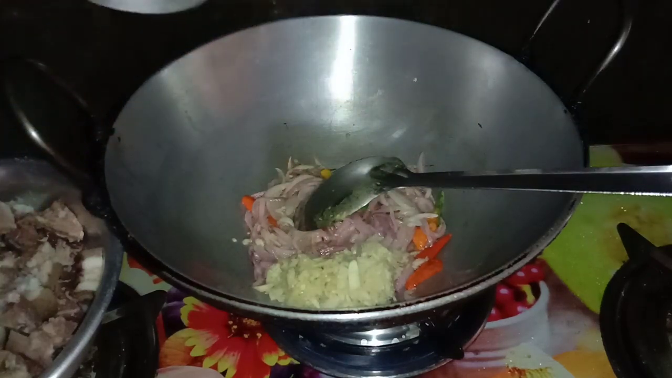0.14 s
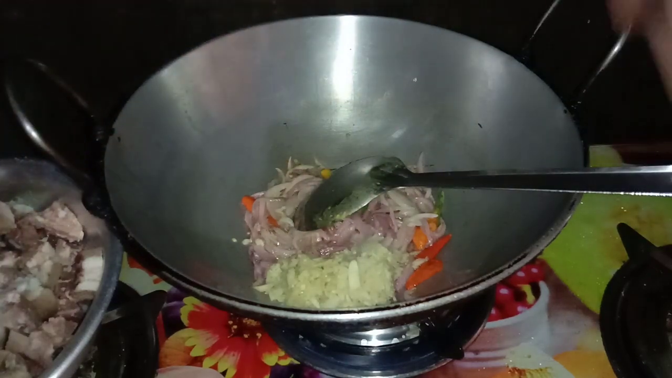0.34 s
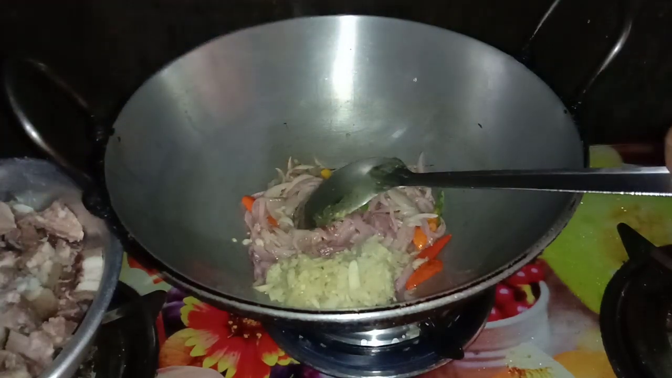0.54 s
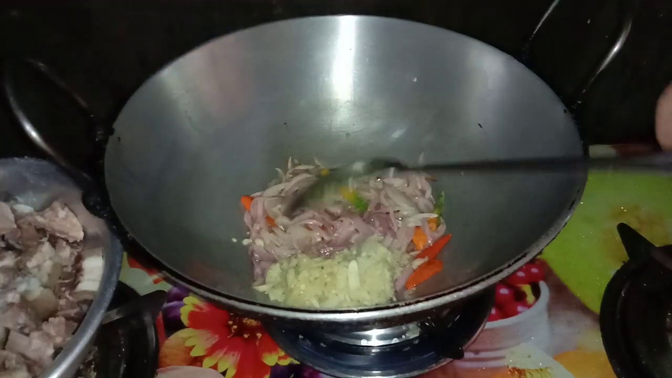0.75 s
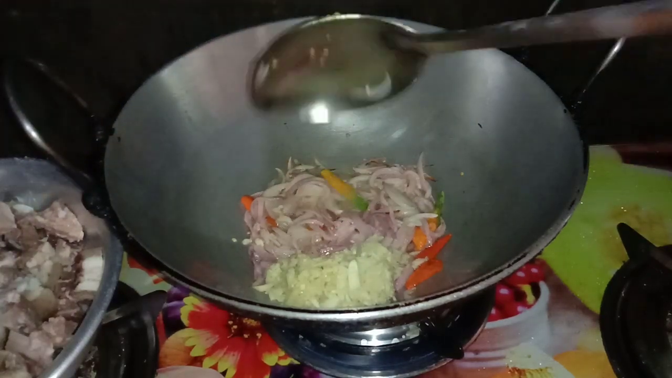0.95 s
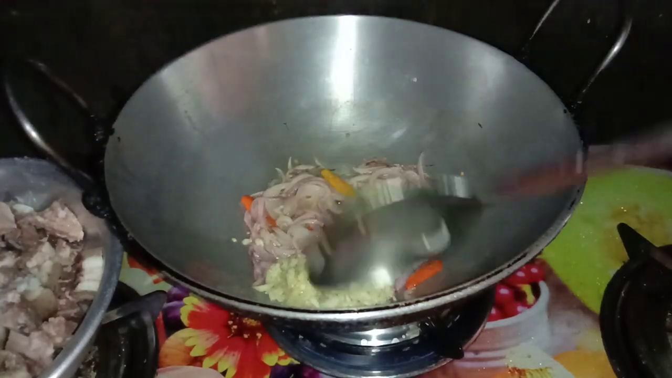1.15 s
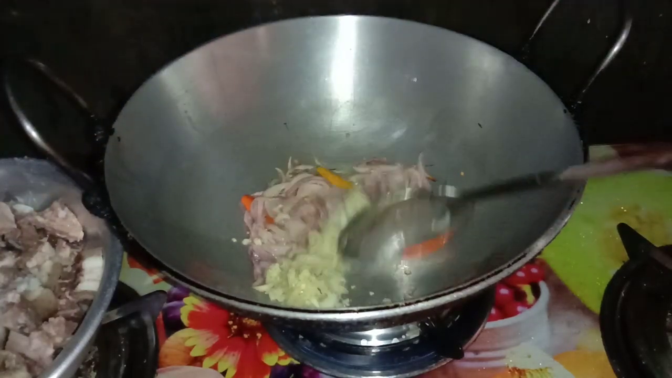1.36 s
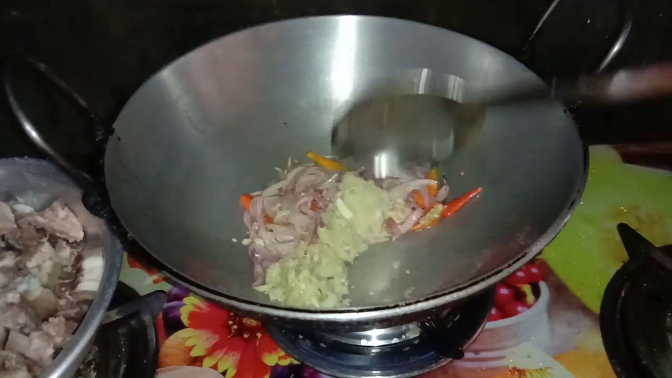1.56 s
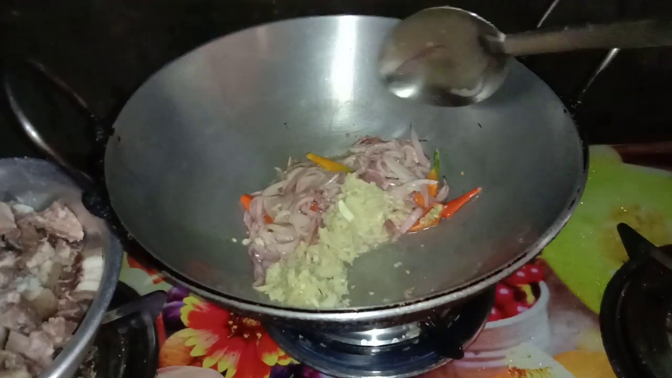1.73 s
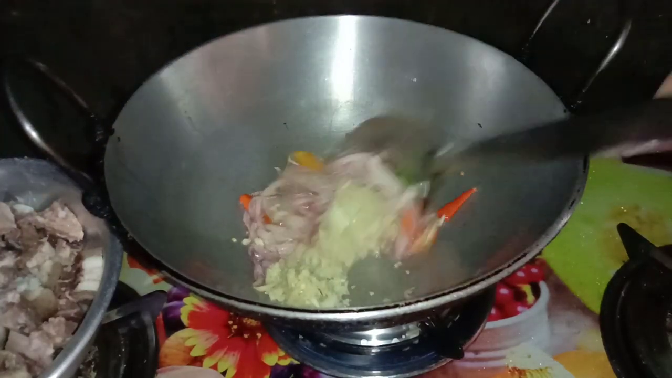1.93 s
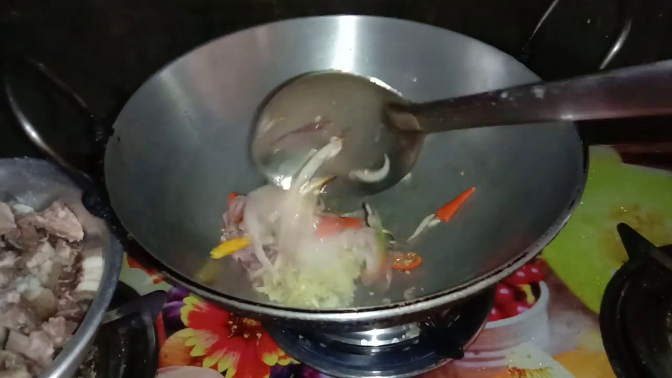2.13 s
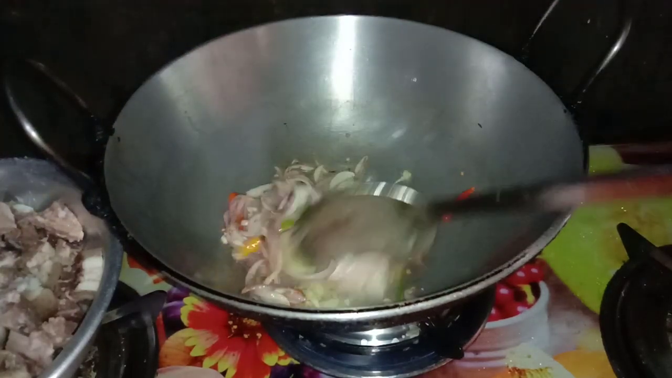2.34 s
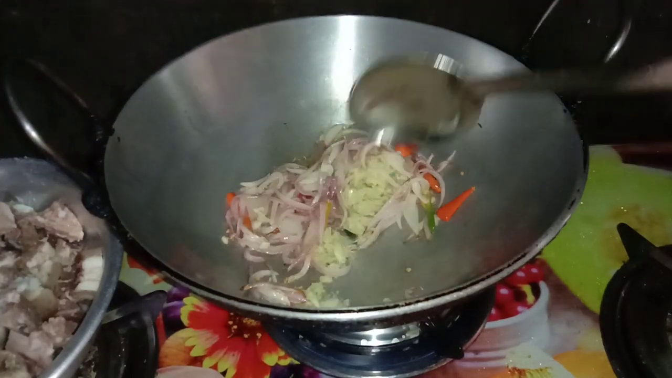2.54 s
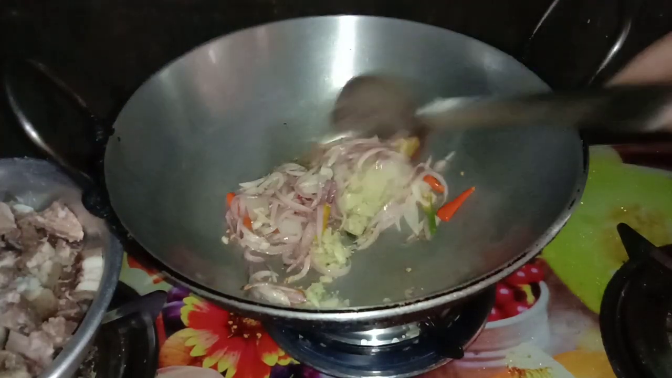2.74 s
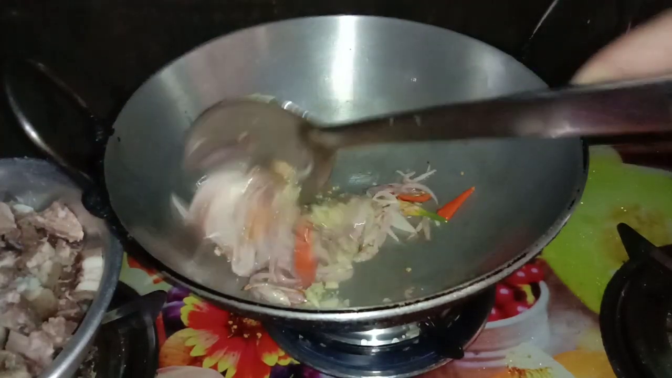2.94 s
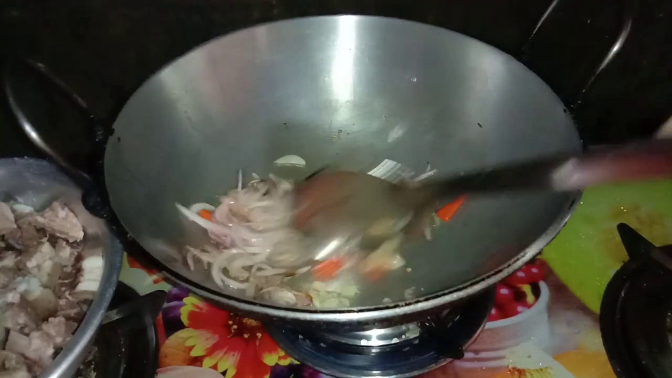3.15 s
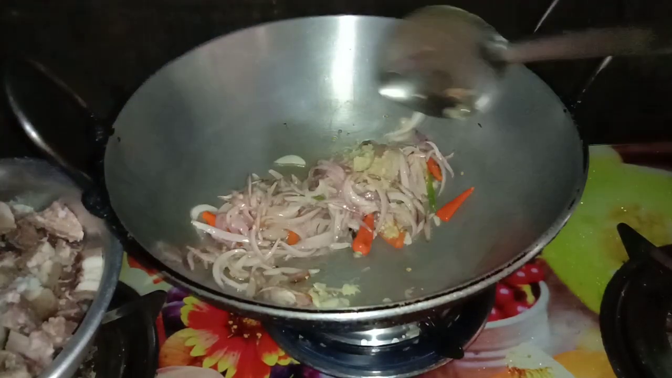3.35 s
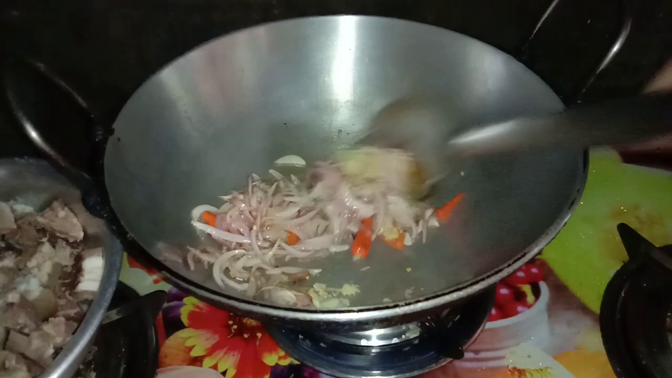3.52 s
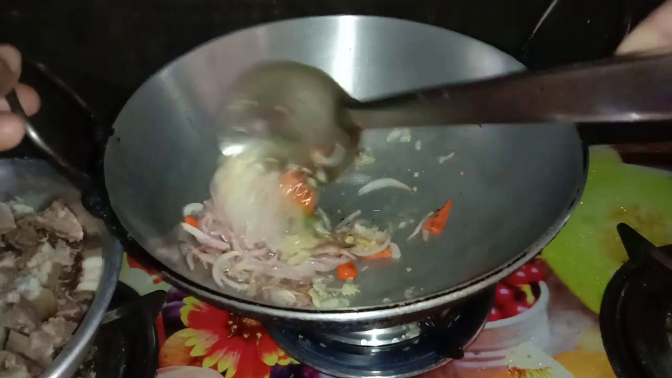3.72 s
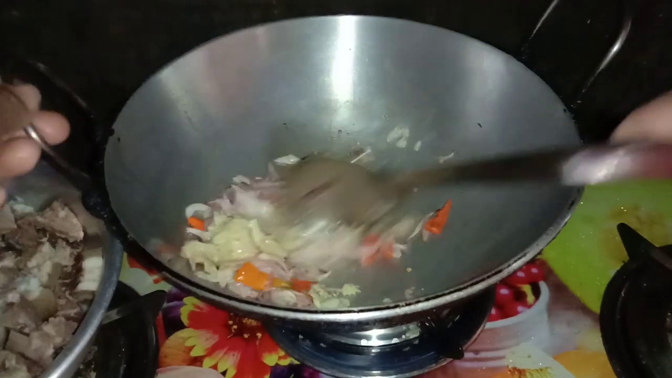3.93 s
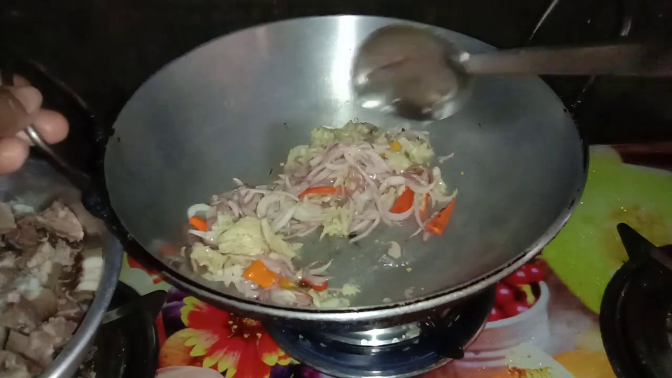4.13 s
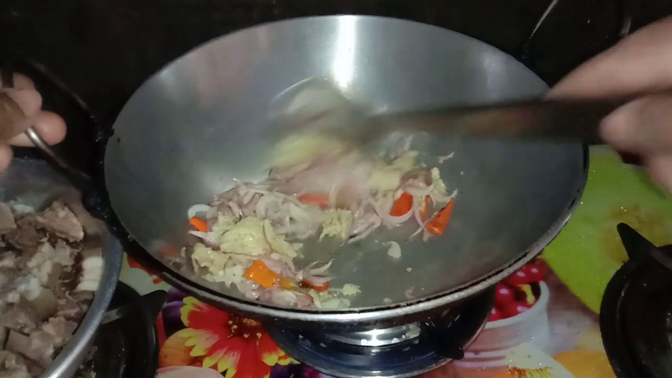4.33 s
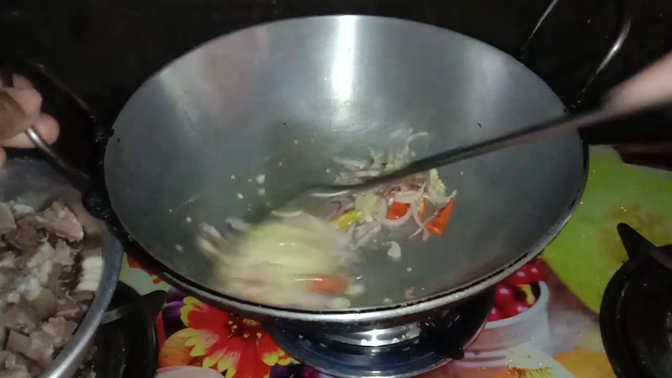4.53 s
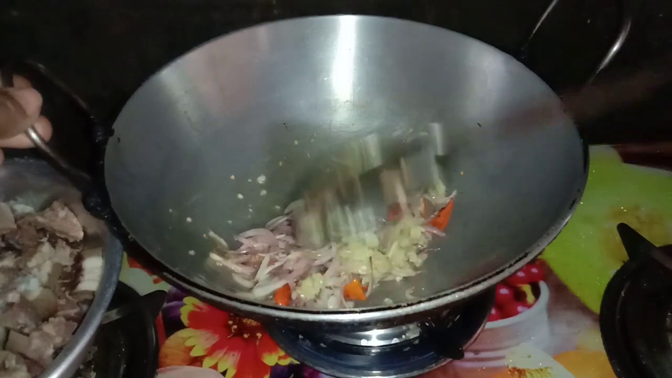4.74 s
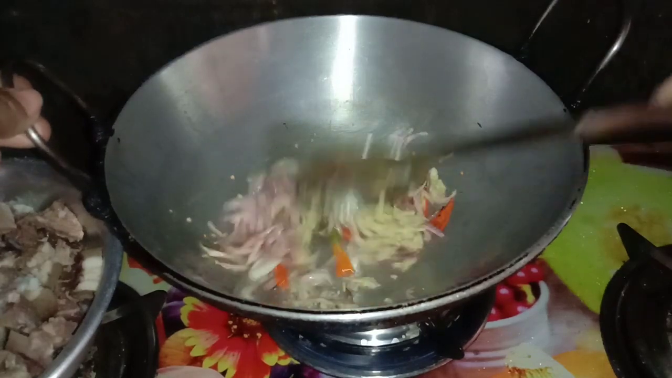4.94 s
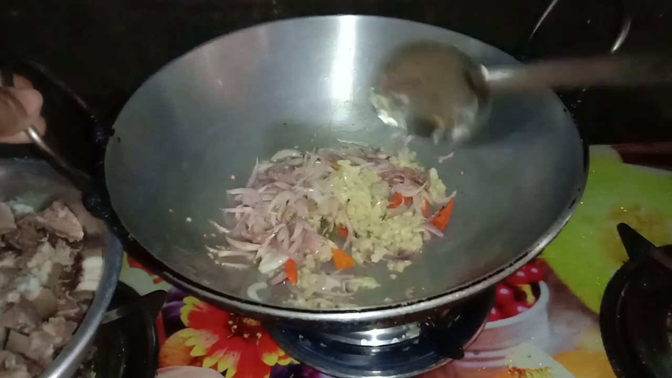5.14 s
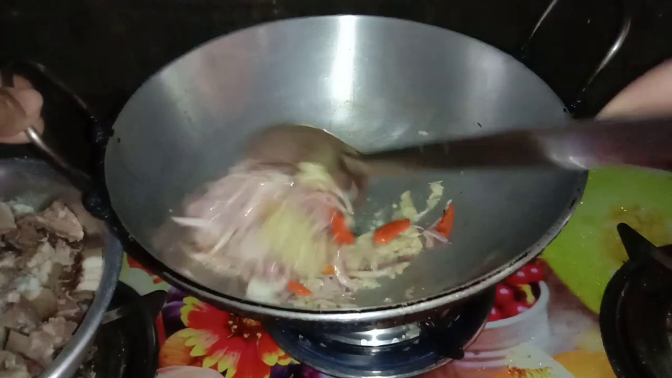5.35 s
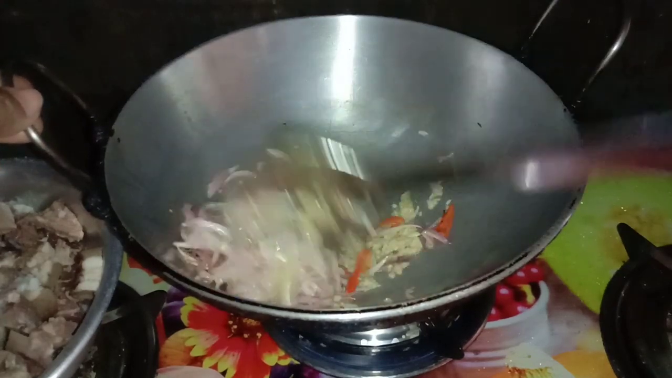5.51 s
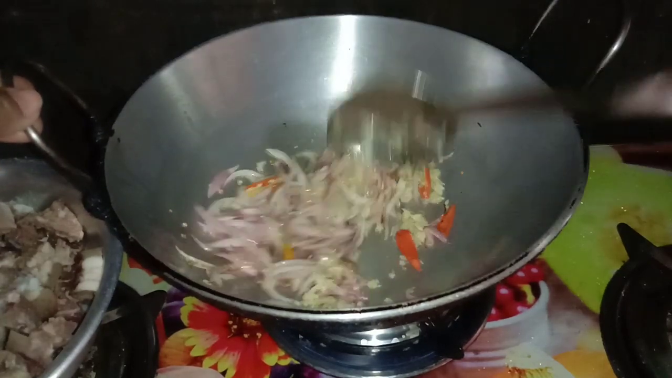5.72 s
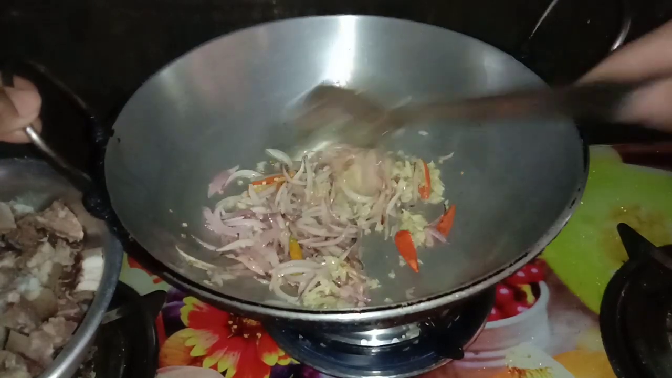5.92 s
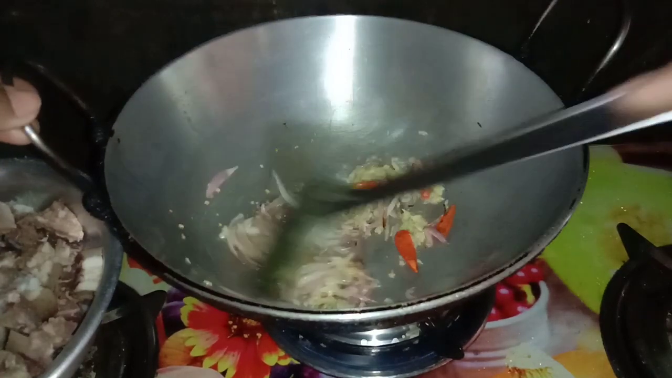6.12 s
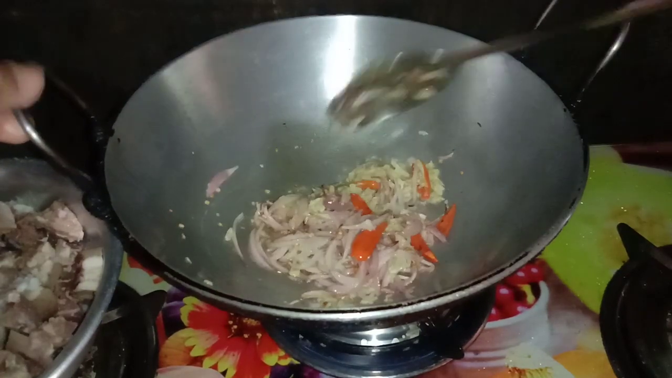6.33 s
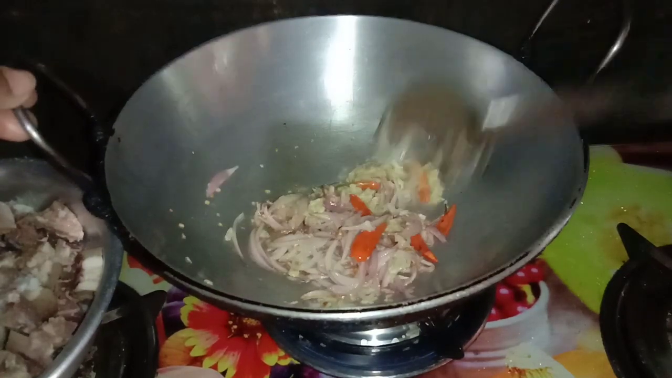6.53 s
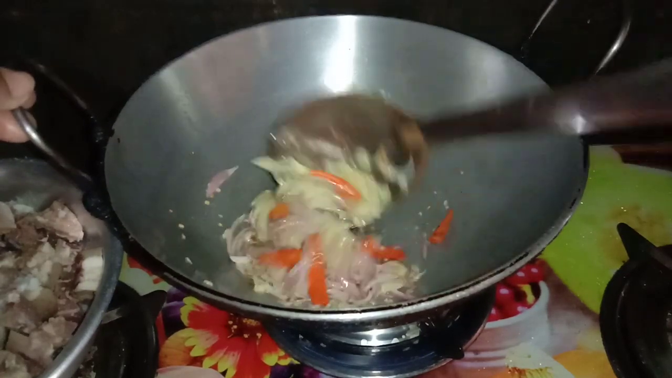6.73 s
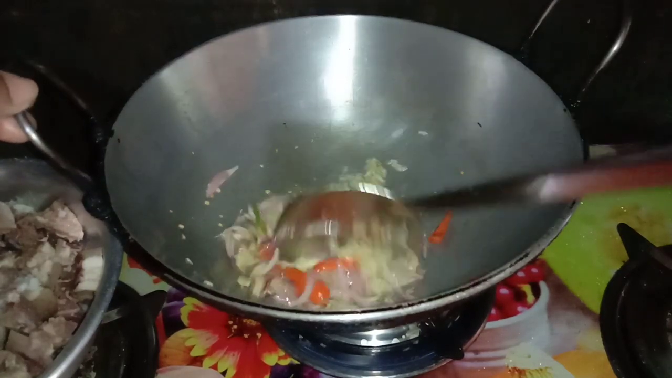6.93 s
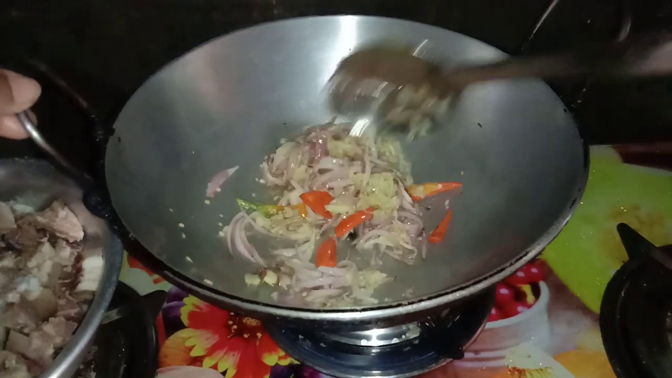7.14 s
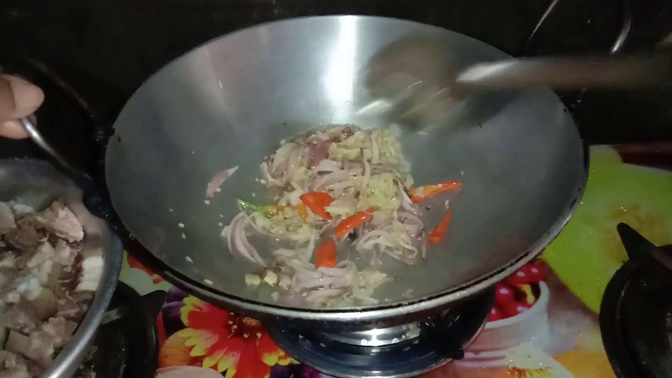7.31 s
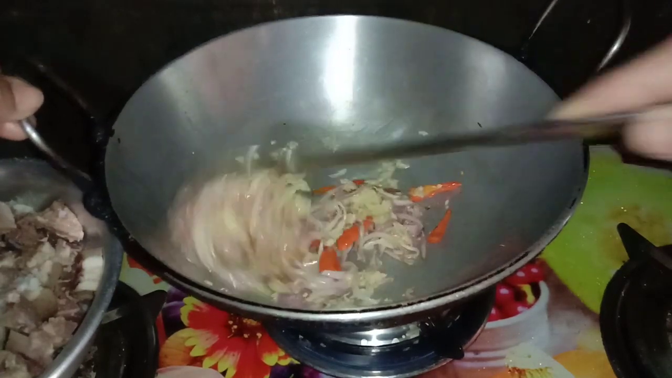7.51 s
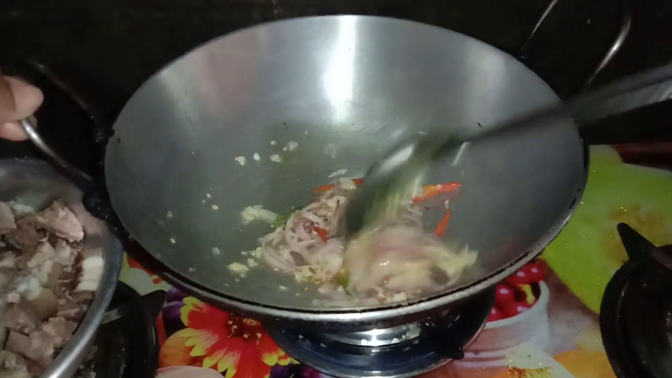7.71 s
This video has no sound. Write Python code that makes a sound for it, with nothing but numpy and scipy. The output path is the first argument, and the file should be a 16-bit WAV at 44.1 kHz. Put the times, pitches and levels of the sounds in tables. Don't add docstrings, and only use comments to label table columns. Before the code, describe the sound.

Wet vegetables sizzle and crackle steadily in a wok of hot oil, with steel ticks, spoon taps and short metallic scrapes.

```python
import sys
import numpy as np
from scipy import signal
from scipy.fft import rfft, irfft
from scipy.io import wavfile
from scipy.ndimage import uniform_filter1d, map_coordinates

SR = 44100
rng = np.random.default_rng(int(sys.argv[2]) if len(sys.argv) > 2 else 0)


def to_wav(sig):
    pcm = np.clip(np.atleast_2d(sig), -1, 1) * 32767
    pcm = np.round(pcm).astype(np.int16)
    wavfile.write(sys.argv[1], SR, pcm.T)


def rack_gain(trim_db):
    fader = np.asarray(trim_db, float)
    return 10 ** (fader / 20)


N = 342657
TIME_S = np.arange(N) / SR

# t/s, frying level/dB
HEAT = [(0, -37.5), (.7, -39.5), (1.15, -38.5), (1.3, -35), (1.5, -33.5), (1.8, -36.5), (2.05, -32),
        (2.45, -29), (2.7, -32.5), (2.92, -30), (3.5, -31), (3.85, -32), (4.05, -34), (4.25, -32),
        (5.05, -28.5), (5.3, -30), (6.0, -30.5), (6.75, -30), (6.95, -29), (7.35, -31), (7.5, -30),
        (7.77, -31)]
# t/s, depth/dB, length/s
FOLDS = [(0.484, 2.5, 0.05), (1.19, 3, 0.039), (1.396, 3.5, 0.075), (1.622, 0, 0.092), (2.365, 5, 0.07),
         (2.512, 6, 0.025), (2.631, 3.5, 0.046), (3.094, 2, 0.16), (3.593, 3.5, 0.097), (3.77, 6, 0.035),
         (3.92, 2, 0.11), (3.978, 4.5, 0.022), (4.227, 2, 0.038), (4.319, 5, 0.045), (4.381, 3.5, 0.027),
         (4.476, 3.5, 0.019), (4.575, 4, 0.085), (4.797, 4, 0.12), (4.972, 2.5, 0.091), (5.126, 6.5, 0.097),
         (5.262, 2.5, 0.039), (5.464, 1.5, 0.068), (5.608, 3, 0.03), (5.815, 3.5, 0.056), (5.876, 3, 0.017),
         (6.089, 6, .02), (6.108, 6.5, 0.035), (6.296, 3.5, 0.078), (6.68, 3.5, 0.08), (6.838, 4.5, 0.085),
         (7.012, 4.5, 0.058), (7.173, 3.5, 0.11), (7.592, 3, 0.074)]
# f/Hz, density/dB per Hz
FRY_COLOUR = [(500, -36.5), (850, -23), (1250, -17), (1600, -12.5), (2400, -11.5), (3800, -7), (5000, -4),
              (6000, -1), (6600, -1), (7400, -0.5), (9000, -12), (12400, -21), (13900, -26), (14650, -10.5)]
# f/Hz, width/Hz, level/dB
BOWL_MODES = [(1278, 109, -19.5), (2163, 420, -29.5), (3346, 860, -26)]
# t/s, peak/dB, t60/s, f/Hz
SPURTS = [(1.098, -11, 0.026, 3580), (1.412, -29, 0.016, 7200), (1.509, -22, 0.053, 7400),
          (2.2679, -13.5, 0.24, 5500), (2.5357, -24, 0.059, 5800), (3.014, -24, 0.042, 6200),
          (4.0249, -16.5, 0.2, 7500), (4.404, -18.5, 0.12, 6270), (4.548, -11, 0.021, 4800),
          (4.619, -20, 0.059, 6500), (5.473, -15.5, 0.061, 6600), (5.845, -14, 0.08, 5800),
          (5.89, -19.5, .1, 4900), (5.908, -17, .04, 7300), (6.8664, -24, 0.041, 5900),
          (6.457, -8, .02, 9500), (7.256, -9.5, .03, 7200)]
# middle t/s, change/dB, length/s, f/Hz
PATCHES = [(0.329, 2, 0.058, 5509), (0.524, 3, 0.14, 5509), (0.559, 1, 0.108, 14465),
           (0.743, -1.7, 0.164, 8584), (0.973, 1.5, 0.061, 5509), (1.028, 3.9, 0.057, 14465),
           (1.287, 2.1, 0.168, 14465), (1.332, -3.5, 0.124, 5509), (1.352, 0.5, 0.185, 2049),
           (1.467, 2.5, 0.104, 8584), (1.53, 6, 0.061, 14465), (1.566, -2.4, 0.091, 3588),
           (1.626, 5, 0.046, 14465), (1.641, 3, 0.152, 2049), (1.736, -6.5, 0.081, 2049),
           (1.806, -2.7, 0.09, 3588), (1.936, 3, 0.098, 14465), (1.955, 2, 0.084, 5509),
           (1.98, 1.5, 0.076, 8584), (2.065, -2.0, 0.069, 5509), (2.213, -4.5, 0.15, 8584),
           (2.449, 4, 0.12, 2049), (2.715, 4.5, 0.074, 2049), (2.993, 1.8, 0.115, 5509),
           (3.991, 4.0, 0.071, 8584), (4.031, 4.2, 0.071, 14465), (4.151, 3, 0.114, 14465),
           (4.405, -1.5, 0.182, 3588), (4.545, -2, 0.108, 14465), (4.644, 1.5, 0.164, 2049),
           (4.794, 2.7, 0.11, 14465), (4.956, -3.7, 0.11, 2049), (5.054, 3.5, 0.16, 8584),
           (5.33, -3, 0.067, 2049), (5.328, -1.5, 0.066, 3588), (5.996, -5, 0.058, 2049),
           (6.081, -3.7, 0.065, 14465), (6.415, -2.9, 0.096, 2049), (6.42, -1, 0.091, 3588),
           (6.475, -3.0, 0.078, 14465), (6.605, -2.1, 0.132, 14465), (6.635, -1.5, 0.068, 2049),
           (6.725, -3.5, 0.08, 8584), (6.844, -3.6, 0.102, 14465), (6.969, -2.1, 0.1, 2049),
           (6.999, 1.6, 0.14, 5509), (7.403, -2, 0.101, 3588), (7.418, -3.2, 0.077, 2049)]
# from f/Hz, to f/Hz
PATCH_RANGES = [(1500, 2800), (2800, 4600), (4600, 6650), (6650, 11000), (12500, 16000)]
# t/s, peak/dB, f/Hz
CRACKLES = [(1.412, -16, 7220), (1.508, -9, 7700), (1.6806, -24, 5810), (1.7848, -25, 6930),
            (2.138, -15, 5860), (2.646, -15, 7560), (2.82, -16, 5810), (3.0146, -20, 6180),
            (3.0325, -16, 5880), (3.7773, -16, 6060), (3.9764, -26, 7480), (3.999, -16, 7300),
            (4.0243, -15, 7130), (4.2814, -9, 7600), (4.378, -12, 7750), (4.5486, -13, 4800),
            (4.6708, -18, 6400), (4.7012, -21, 6860), (4.794, -8, 7500), (4.958, -21, 5850),
            (5.472, -16, 7350), (5.6294, -20, 7360), (5.845, -18, 5800), (5.979, -21, 6150),
            (6.1499, -16, 7250), (6.225, -17, 4900), (6.8673, -13, 5940), (7.1627, -21, 5410),
            (7.1924, -13, 6950), (7.465, -19, 5820), (7.497, -11, 6280), (7.5184, -16, 6290),
            (7.5354, -12, 6190), (7.6907, -18, 6170), (1.0973, -18, 4200), (1.8885, -18, 3600),
            (1.897, -14.5, 2580), (1.9118, -13, 3100), (2.269, -8, 6020), (2.536, -11, 7130),
            (4.4043, -20, 6260), (4.6177, -22, 6380), (6.4585, -10, 4790), (6.5663, -10, 5800),
            (6.587, -13, 4800), (5.768, -13, 6900), (5.979, -13, 7200), (7.2576, -10, 7100)]
# f/Hz, level/dB, t60/s
WOK_LOW = [(355, 1, 3.5), (366.3, -11, 1.0), (496, -3, 3.1), (559, -2, 0.4), (641, -3, 1.6),
           (736, -13, 0.35)]
WOK_MID = [(1077, -1.5, .62), (1147, -2, 0.6), (1253, -10, 0.66)]
WOK_HIGH = [(2080, -6, 0.05), (2400, 5, 0.092), (2660, -6, 0.032), (2980, 2.5, 0.035), (4500, -9, .05),
            (4940, 11.5, 0.07), (6260, 12, 0.084), (7450, -9.5, 0.037), (7220, 11, 0.09), (7600, -6, 0.026)]
# t/s, low modes/dB, middle modes/dB, crack/dB, time until food damps the ring/s
TAPS = [(1.217, -65, -28.5, 0.8, 0.99), (1.27, -49, -63, -50, 0.56), (1.9, -43.5, -44, -30, 0.42),
        (2.264, -42.5, -58, -26, 0.036), (2.421, -45, -63, -40, 0.035), (2.493, -40, -65, -35, 0.014),
        (2.693, -42, -40, -26, 0.015), (2.742, -52, -44, -45, .14), (4.196, -35, -42, -39, 0.047),
        (4.404, -34.5, -22, -15, 0.012), (4.841, -44.5, -43, -22, 0.027), (5.019, -54, -60, -52, 0.07),
        (5.211, -42.5, -36, -14, 0.023), (5.8455, -55, -33.5, -13, 0.52), (6.457, -39.5, -62, -14, 0.16),
        (6.539, -38, -41, -12, 0.043), (7.2565, -36.5, -40, -4.5, 0.09)]
# f/Hz, level/dB
CRACK_COLOUR = [(300, -18.5), (1600, 1), (5000, 1), (8000, 6.5), (12000, -24), (15000, -16)]
# t/s, level/dB, free time/s, f/Hz
BOUNCES = [
    (6.457, -39, 0.075, 2628),
    (7.258, -47, .05, 2628),
    (7.318, -36, .012, 2330),
    (1.3, -52, 0.26, 3600),
]
# t/s, length/s, level/dB, loudest f/Hz, travel/octaves
SCRAPES = [(1.825, 0.026, -37, 2550, 0.01), (1.889, 0.069, -38, 2700, 0.13),
           (1.893, 0.035, -37.5, 447, 0.043), (4.404, 0.07, -36.5, 1080, 0.1),
           (4.406, 0.056, -43, 755, -0.1), (5.623, 0.092, -61, 400, 0.075), (5.844, 0.024, -41.5, 460, 0.1),
           (5.908, .04, -53, 400, 0.1), (5.973, 0.051, -48, 420, 0.34), (5.976, .12, -39.5, 1120, 0.17),
           (5.988, .11, -42.5, 700, 0.3), (6.038, 0.083, -50.5, 563, 0.31), (6.019, 0.092, -46, 1600, 0.15),
           (6.459, .03, -50, 554, 0.046), (6.455, .02, -42, 2750, 0.01), (6.541, .02, -37, 2550, 0.01),
           (6.882, 0.076, -46, 1200, 0.13), (7.256, 0.018, -35, 2630, -0.019),
           (7.318, 0.036, -42, 1280, 0.1), (7.357, 0.043, -36.5, 1280, -0.05),
           (7.39, 0.063, -41.5, 1220, -.1), (7.434, 0.12, -38, 1120, -0.13),
           (7.435, 0.13, -44, 1340, 0.078), (7.43, 0.079, -46.5, 410, 0.13), (7.451, .1, -47, 720, 0.11),
           (7.504, 0.077, -48.5, 402, -0.05), (0.634, 0.14, -59.5, 468, .02), (0.857, 0.063, -60, 400, .01),
           (1.009, 0.073, -59, 743, 0.047), (1.13, .08, -61, 610, .02), (4.185, .04, -51, 1280, -.25)]
# f/Hz, width/Hz, level/dB
HELD_MODES = [(413, 52, 2.5), (485, 44, -3.5), (593, 57, 6), (743, 29, 0.5), (903, 50, 1.5), (1084, 35, 1),
              (1168, 51, 3.5), (1270, 51, 5), (1450, 39, -5.5), (1730, 77, 2), (2250, 110, -0.5),
              (2460, 99, 1), (2715, 84, -3), (3070, 120, -2)]
# f/Hz, width/Hz, level/dB
DISH_MODES = [(942, 60, -12), (2070, 50, -5), (3060, 150, -12), (4480, 60, -13), (5300, 70, 0),
              (5700, 90, -9), (6720, 90, -12), (7430, 90, -7), (9630, 130, -12), (10800, 90, -22),
              (11750, 90, -23), (13500, 140, -20)]
# middle t/s, length/s, level/dB, lowest mode/dB, upper modes/dB
RUBS = [(0.082, 0.028, -31, -6, 2.5), (0.106, 0.037, -32.5, 5, 6.5), (0.312, 0.032, -42, 4, -3),
        (0.378, 0.086, -42, 7, 1.5), (0.41, 0.041, -38.5, -11, -1), (.452, 0.035, -35.5, -7, -8),
        (.49, 0.077, -40.5, -1, 0), (0.57, 0.054, -34, -9, 2), (0.883, 0.044, -43, -15, -4),
        (0.937, 0.064, -37, -5, -3), (0.997, 0.058, -27.5, -15, -5.5), (1.055, 0.031, -33.5, -14, -7)]
# t/s, peak/dB, lowest three modes/dB
TICKS = [
    (0.0657, -17, -20, 3, -3),
    (0.0054, -13.5, 3, -14, 5),
    (.3107, -22, -14, -12, 0),
    (.4623, -18, -16, -12, -4),
    (.5372, -8.5, -17.5, -12, 5),
]
# f/Hz, width/Hz, level/dB
COUNTER_MODES = [(215, 85, -8), (420, 71, -3.5), (632, 33, -3.5), (933, 56, -4.5), (1230, 110, 2),
                 (1990, 120, -8), (2530, 110, -4.5), (3100, 55, -17), (3240, 73, -13), (3800, 110, -22)]
# t/s, peak/dB, t60/s, tilt/dB per octave
KNOCKS = [
    (1.612, -15, 0.11, -3),
    (1.645, -27.5, 0.22, -1.5),
    (1.829, -14, 0.13, -1),
    (3.142, -44.5, 0.3, -10),
    (5.017, -46, .16, -14),
    (5.372, -52, 0.088, -27),
]
# t/s, peak/dB, length/s
SHAKES = [
    (1.64, -54, .08),
    (1.853, -57, .06),
    (4.208, -62, 0.059),
    (4.904, -66, .08),
    (5.866, -62, .06),
    (6.506, -60, 0.081),
    (7.075, -62, 0.055),
    (7.306, -57, 0.084),
]
# f/Hz, density/dB per Hz
KITCHEN_COLOUR = [(15, -54), (25, -31), (44, -8), (87, -0.5), (259, 3.5), (361, 2.5), (438, -1),
                  (619, -7.5), (900, 3), (1170, 1), (1980, -120)]
# middle t/s, length/s, level/dB
SHOVES = [(0.325, 0.13, -58), (0.706, 0.16, -53), (1.326, 0.4, -55), (1.91, 0.22, -50), (2.48, 0.15, -53),
          (2.766, 0.13, -54), (3.155, 0.14, -60), (4.36, 0.21, -52), (4.6, 0.088, -78), (5.04, 0.035, -64),
          (5.222, 0.064, -52), (5.65, 0.1, -55), (6.6, 0.22, -61), (6.895, 0.079, -59)]


def unit(x):
    return x / np.sqrt(np.mean(x ** 2))


def typical(x):
    return x / (1.48 * np.median(np.abs(x)))


def colour(x, points):
    hz, db = np.transpose(points)
    grid_hz = np.arange(1025) * SR / 2048
    gain_db = np.interp(np.log(grid_hz + 1), np.log(hz), db)
    ceps = irfft(gain_db * np.log(10) / 20)
    ceps[1:1024] *= 2
    ceps[1025:] = 0
    return signal.fftconvolve(x, irfft(np.exp(rfft(ceps))))[:len(x)]


def band(x, lo_hz, hi_hz):
    return signal.sosfilt(signal.butter(2, [lo_hz, hi_hz], "band", fs=SR, output="sos"), x)


def band_in_phase(x, lo_hz, hi_hz):
    return signal.sosfiltfilt(signal.butter(2, [lo_hz, hi_hz], "band", fs=SR, output="sos"), x)


def highpass(x, order, hz):
    return signal.sosfilt(signal.butter(order, hz, "high", fs=SR, output="sos"), x)


def ring(x, hz, t60_s):
    r = 10 ** (-3 / (t60_s * SR))
    w = 2 * np.pi * hz / SR
    return signal.lfilter([0, np.sin(w)], [1, -2 * r * np.cos(w), r * r], x)


def walk(rate_hz):
    k = int(SR / rate_hz)
    steps = np.repeat(rng.standard_normal(N // k + 1), k)
    return unit(uniform_filter1d(uniform_filter1d(steps, k), k)[:N])


def clicks(per_s, spread_db, count):
    chance = rng.random((count, 3))
    sign = np.sign(chance[:, 1] - .5)
    return (chance[:, 0] < per_s / SR) * sign * rack_gain(-spread_db * np.log(chance[:, 2] + 1e-9))


def fade(t, t60_s):
    return 10 ** (-3 * t / t60_s)


def hump(at_s, length_s):
    out = np.zeros(N)
    near = slice(max(int((at_s - 2 * length_s) * SR), 0), int((at_s + 2 * length_s) * SR))
    out[near] = 2 ** -((TIME_S[near] - at_s) * 2 / length_s) ** 2
    return out


def add(out, at_s, x):
    i = int(at_s * SR)
    out[i:i + len(x)] += x[:len(out) - i]


def steam_pops(level_db):
    pops = unit(clicks(per_s=5000, spread_db=1.5, count=N)) + rack_gain(5.5) * rng.standard_normal(N)
    pops = unit(pops * rack_gain(.1 * walk(40) + .7 * walk(250)))
    spits = np.abs(clicks(per_s=170, spread_db=.75, count=N))
    flurries = signal.lfilter([1], [1, -fade(1 / SR, .012)], spits)
    pops = typical(pops * (1 + rack_gain(-7) * flurries))
    t = TIME_S[:SR // 5]
    span = .22
    for at_s, peak_db, t60_s, hz in SPURTS:
        spray = unit(clicks(9000, 1.8, count=len(t)))
        pitched = unit(band(spray, hz * (1 - span), hz * (1 + span)))
        spurt = fade(t, t60_s) * (0.5 * spray + 0.57 * pitched)
        add(pops, at_s, rack_gain(peak_db - 14 - level_db[int(at_s * SR)]) * spurt)
    return pops


def frying():
    heat_db = np.interp(TIME_S, *np.transpose(HEAT))
    fold_db = sum(db * hump(at_s, length_s) for at_s, db, length_s in FOLDS)
    level_db = heat_db - fold_db
    pops = steam_pops(level_db)
    fry = typical(colour(pops, FRY_COLOUR))
    for hz, width_hz, db in BOWL_MODES:
        fry = fry + rack_gain(db) * typical(band(pops, hz - width_hz / 2, hz + width_hz / 2))
    notch_hz, notch_width_hz = 6630, 260
    fry = fry - 0.53 * band_in_phase(fry, notch_hz - notch_width_hz / 2, notch_hz + notch_width_hz / 2)
    upper = band_in_phase(fry, 6700, 10000) * (rack_gain(.4 * walk(6)) - 1)
    middle = band_in_phase(fry, 3800, 5200) * (rack_gain(.4 * walk(8)) - 1)
    fry = fry + upper + middle
    low = signal.sosfiltfilt(signal.butter(2, 2800, fs=SR, output="sos"), fry)
    top = signal.sosfiltfilt(signal.butter(6, 12500, "high", fs=SR, output="sos"), fry)
    over_full_db = heat_db + 31
    deep = typical(low * rack_gain(1.2 * walk(30))) * rack_gain(-42.5 + over_full_db - fold_db)
    mist = typical(top * rack_gain(0.88 * walk(380) + 0.64 * walk(70)))
    mist = mist * rack_gain(-29 + 1.16 * over_full_db - 0.54 * fold_db)
    return (fry - low - top) * rack_gain(level_db + 6.0) + deep + mist


def patches(fry):
    out = fry
    for lo_hz, hi_hz in PATCH_RANGES:
        change_db = sum(db * hump(at_s, length_s) for at_s, db, length_s, hz in PATCHES if lo_hz < hz < hi_hz)
        out = out + band_in_phase(fry, lo_hz, hi_hz) * (rack_gain(change_db) - 1)
    return out


def crackles():
    out, t = np.zeros(N), TIME_S[:SR // 20]
    click = 1. * (t == 0)
    for at_s, peak_db, hz in CRACKLES:
        tick = band(click, 2200, 10600)
        spray = fade(t, .03) * band(rng.standard_normal(len(t)), hz * 0.53, hz * 1.5)
        drop = 0.57 * tick / tick.max() + ring(click, hz, t60_s=.0045) + .2 * spray
        add(out, at_s, rack_gain(peak_db - 0.5) * drop / np.abs(drop).max())
    return out


def shell(push, modes, damping, undamped=0):
    out = 0
    for k, (hz, db, t60_s) in enumerate(modes):
        load = damping if k >= undamped else 1
        out = out + (-1) ** k * rack_gain(db + 2 * rng.standard_normal()) * ring(push, hz, t60_s / load)
    return out


def spoon_taps():
    out, t = np.zeros(N), TIME_S[:SR // 2]
    blow = 1. * (t == 0)
    for at_s, low_db, mid_db, crack_db, free_s in TAPS:
        load = max(0.83 / free_s, 1) ** 1.96
        chatter = .03 * clicks(400, 3.0, count=len(t)) * (t < free_s) * (free_s < .2)
        push = blow + chatter
        modes = rack_gain(low_db) * shell(push, WOK_LOW, load, undamped=2)
        modes += rack_gain(mid_db) * shell(push, WOK_MID, load, undamped=2)
        modes += rack_gain(-36 + 0.23 * crack_db) * shell(push, WOK_HIGH, 1.2)
        thud = fade(t, .08) * unit(band(rng.standard_normal(len(t)), 260, 610))
        modes += rack_gain(low_db - 4) * (free_s < .3) * thud
        rattle = (.2 * fade(t, .012) + .13 * fade(t, .08)) * rng.standard_normal(len(t))
        echo = .7 * np.roll(blow, int(.0006 * SR))
        crack = colour(blow + echo + rattle, CRACK_COLOUR)
        damped = modes * fade(np.maximum(t - free_s, 0), 0.05) * fade(t, 5.0 * free_s)
        add(out, at_s, damped + rack_gain(crack_db) * crack)
    return out


def spoon_bounces():
    out, t = np.zeros(N), TIME_S[:SR // 2]
    t60_s, split_hz = 0.93, 27
    for at_s, level_db, free_s, hz in BOUNCES:
        push = (t == 0) + .2 * clicks(150, 3.0, count=len(t)) * (t < free_s)
        pair = ring(push, hz, t60_s) + 0.91 * ring(push, hz - split_hz, t60_s / 2)
        add(out, at_s, rack_gain(level_db) * pair * fade(np.maximum(t - free_s, 0), .04))
    return out


def spoon_scrapes():
    out, t = np.zeros(N), TIME_S[:SR // 5]
    attack_s, release_s, sag_db, reach_oct = 0.0026, 0.026, 8, 0.18
    catch_db = 1.4 * walk(60)
    for at_s, length_s, level_db, centre_hz, travel_oct in SCRAPES:
        slips = unit(clicks(3500, 1.5, count=len(t)))
        slips = slips * np.clip(np.minimum(t / attack_s, (length_s - t) / release_s), 0, 1)
        slips = slips * rack_gain(catch_db[int(at_s * SR):][:len(t)] - sag_db * t / length_s)
        rasp = 0
        for hz, width_hz, db in HELD_MODES:
            off_oct = np.log2(hz / centre_hz) - travel_oct * t / length_s
            near = np.exp(-.5 * (off_oct / reach_oct) ** 2)
            mode = ring(slips * near, hz, 2.0 / width_hz)
            rasp = rasp + rack_gain(db) * band(mode, hz - 3 * width_hz, hz + 3 * width_hz)
        rasp = rasp * fade(np.maximum(t - length_s, 0), 0.1)
        add(out, at_s, rack_gain(level_db) * rasp / np.std(rasp[:int(length_s * SR)]))
    return out


def dish_pair(x, hz, t60_s):
    lower = (1 if hz < 1500 else .4) * ring(x, hz - 48, t60_s)
    return band(lower + ring(x, hz + 8, t60_s), hz * .85, hz * 1.15)


def dish_rubs():
    grit = unit(clicks(2500, 1.1, count=SR * 2))
    t = TIME_S[:len(grit)]
    patch_db = 2.5 * walk(45)
    modes = []
    for hz, width_hz, db in DISH_MODES:
        caught = grit * rack_gain(np.roll(patch_db, int(3 * hz))[:len(t)])
        modes.append(rack_gain(db) * unit(dish_pair(caught, hz, 2.5 / width_hz)))
    scratch = rack_gain(-8.0) * unit(band(grit, 2800, 10600))
    upper = unit(sum(modes[2:])) + scratch
    rubbed = np.zeros(len(t))
    for at_s, length_s, db, low_db, high_db in RUBS:
        rub = upper * rack_gain(high_db) + modes[1] + modes[0] * rack_gain(low_db)
        rubbed += rack_gain(db) * hump(at_s, length_s)[:len(t)] * rub
    bent_s = t + .0004 * walk(12)[:len(t)]
    rubbed = map_coordinates(rubbed, [bent_s * SR], mode="mirror")
    return np.pad(rubbed, (0, N - len(t)))


def dish_ticks():
    out, t = np.zeros(N), TIME_S[:SR // 4]
    click = 1. * (t == 0)
    for at_s, peak_db, *low_db in TICKS:
        jolt = fade(t, 0.008) * rng.standard_normal(len(t)) + 5.4 * click
        tick = 0
        for k, (hz, width_hz, db) in enumerate(DISH_MODES):
            extra_db = low_db[k] if k < len(low_db) else 0
            tick = tick + rack_gain(db + extra_db) * dish_pair(jolt, hz, 6.8 / width_hz)
        contact = 0.22 * band(jolt, 2300, 8100) + 1.3 * band(click, 1600, 7000)
        add(out, at_s, rack_gain(peak_db) * (tick / np.abs(tick).max() + contact))
    return out


def knocks():
    out, t = np.zeros(N), TIME_S[:SR // 3]
    for at_s, peak_db, t60_s, tilt_db in KNOCKS:
        body = 0
        for hz, width_hz, db in COUNTER_MODES:
            swell = fade(t, t60_s * (400 / hz) ** 0.29) * (1 - fade(t, 3.2 / hz))
            mode = ring(rng.standard_normal(len(t)) * swell, hz, 1.17 / width_hz)
            mode = band(mode, hz * .75, hz * 1.3) * np.sqrt(width_hz)
            body = body + rack_gain(db + tilt_db * np.log2(hz / 500)) * mode
        snap = 0.41 * fade(t, 0.016) * unit(band(rng.standard_normal(len(t)), 400, 3200))
        add(out, at_s, rack_gain(peak_db) * (body / np.abs(body).max() + snap * rack_gain(2.0 * tilt_db)))
    return out


def stove():
    shake = sum(rack_gain(db) * hump(at_s, length_s) for at_s, db, length_s in SHAKES)
    return unit(band(rng.standard_normal(N), 62, 180)) * shake


def kitchen():
    hum = colour(rng.standard_normal(N), KITCHEN_COLOUR)
    bands = [band(hum, hz, hz * 1.3) * rack_gain(2.6 * walk(14)) for hz in 25 * 1.3 ** np.arange(14)]
    rustle = rack_gain(-69.5)
    shove = rustle + sum(rack_gain(db) * hump(at_s, length_s) for at_s, length_s, db in SHOVES)
    return unit(sum(bands)) * rack_gain(-62) + unit(sum(bands[7:12])) * shove * rack_gain(-4.5)


def scene():
    fry = patches(frying())
    spoon = spoon_taps() + spoon_bounces() + spoon_scrapes()
    dish = dish_rubs() + dish_ticks()
    hits = highpass(spoon + dish + crackles(), 3, 260)
    bumps = highpass(knocks(), 3, 165)
    mono = fry + hits + bumps + kitchen() + stove()
    side = unit(band(rng.standard_normal(N), 40, 610)) * rack_gain(-84.0)
    return np.array([mono + side, mono - side])


def top_cut(x):
    return signal.sosfilt(signal.butter(12, 16790, fs=SR, output="sos"), x)


def record(dry):
    rounded = np.tanh(.8 * dry) / .8
    mix = signal.sosfilt(signal.ellip(10, .3, 60, 15560, fs=SR, output="sos"), rounded)
    return top_cut(mix)


dry = scene()
out = record(dry)
to_wav(out)
```